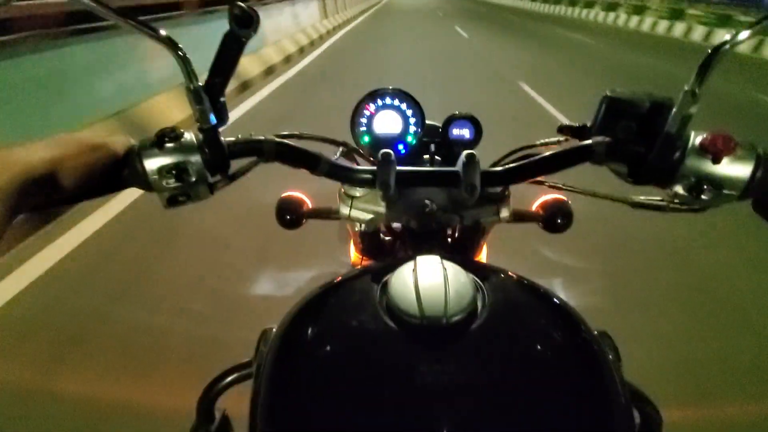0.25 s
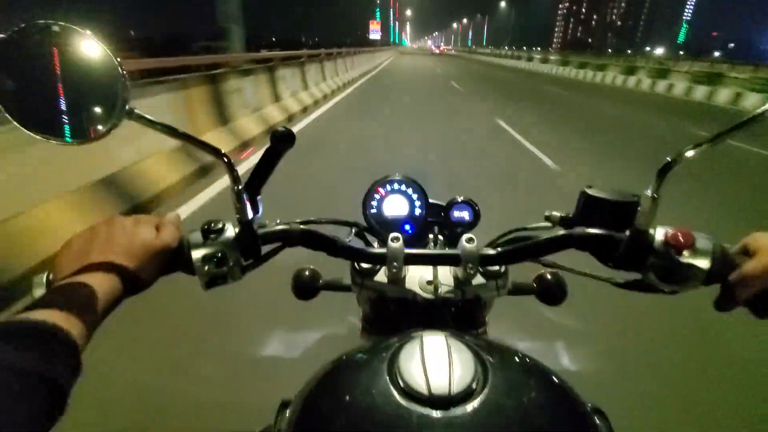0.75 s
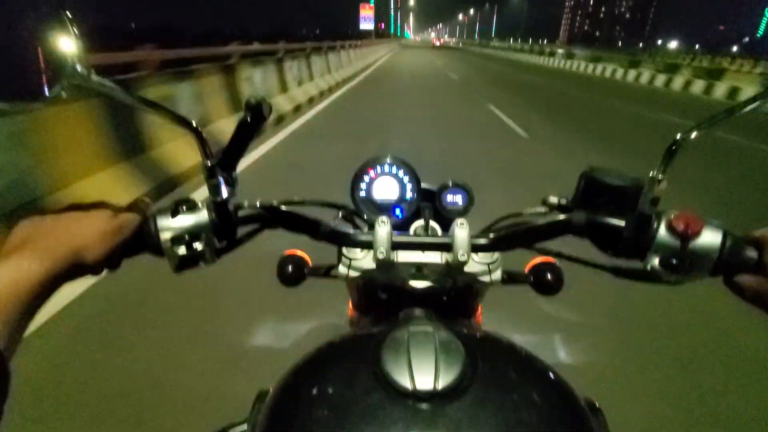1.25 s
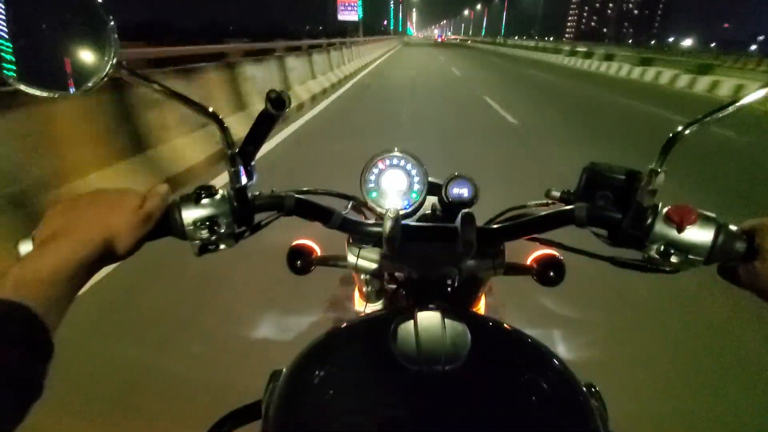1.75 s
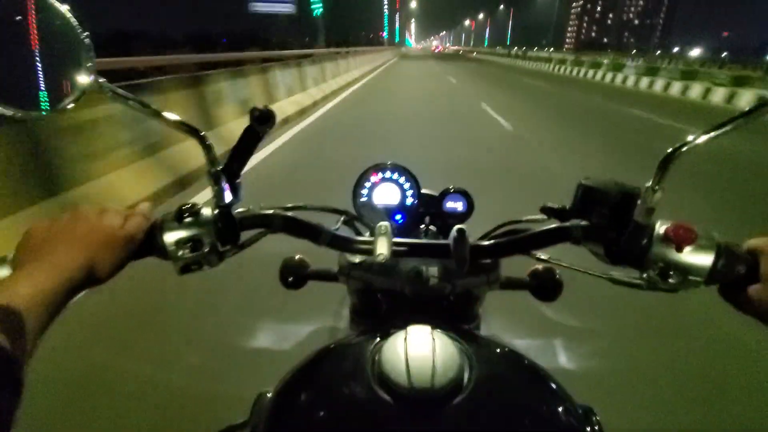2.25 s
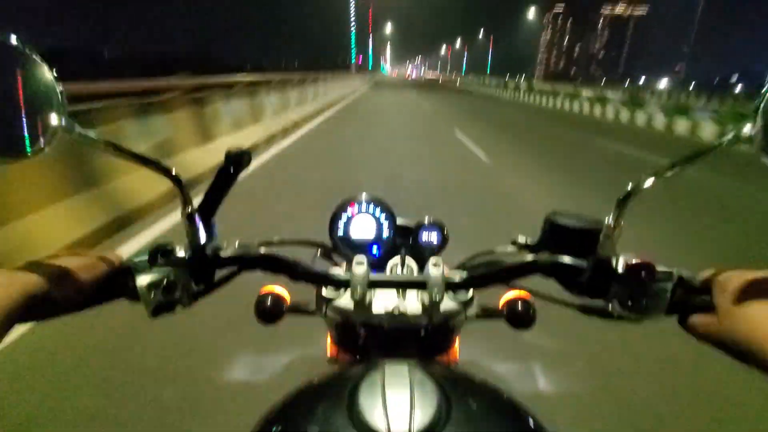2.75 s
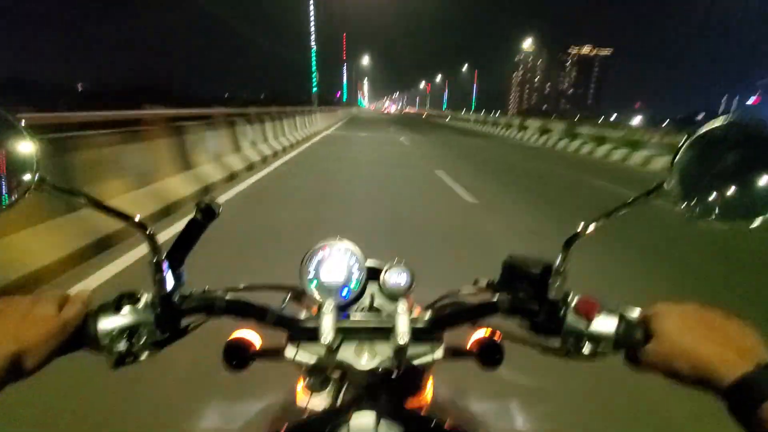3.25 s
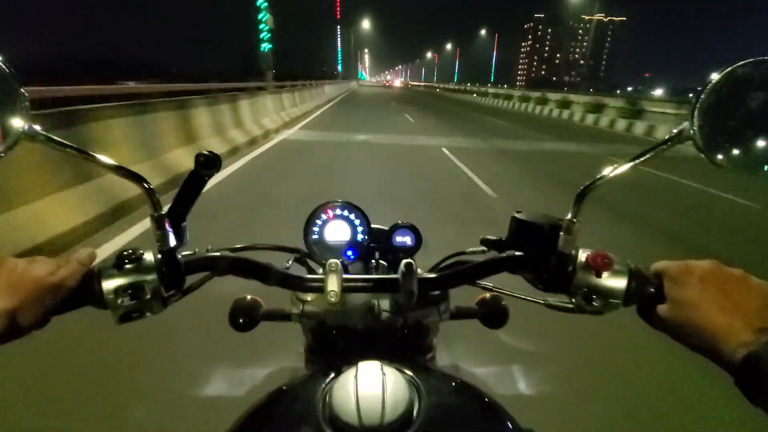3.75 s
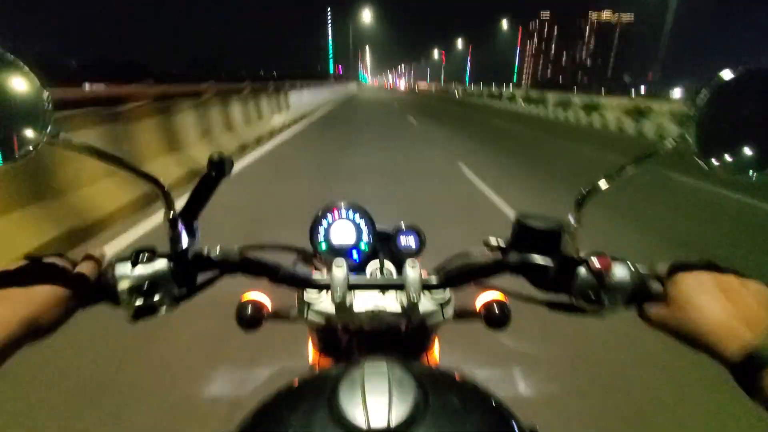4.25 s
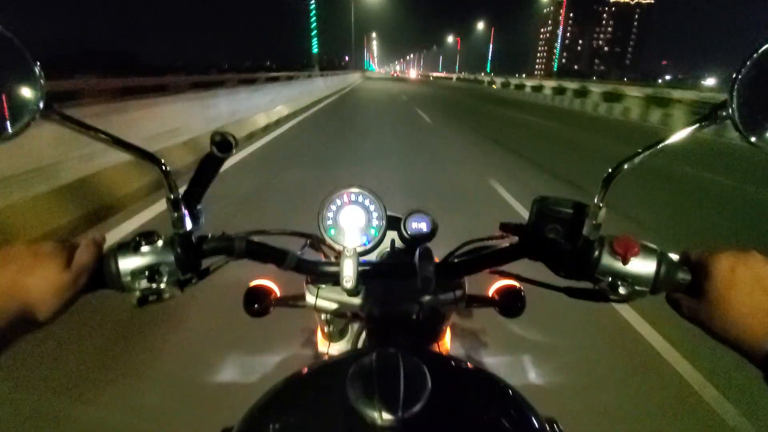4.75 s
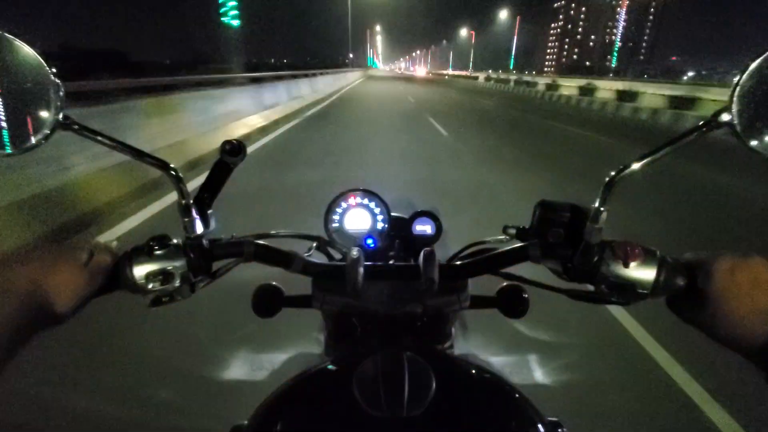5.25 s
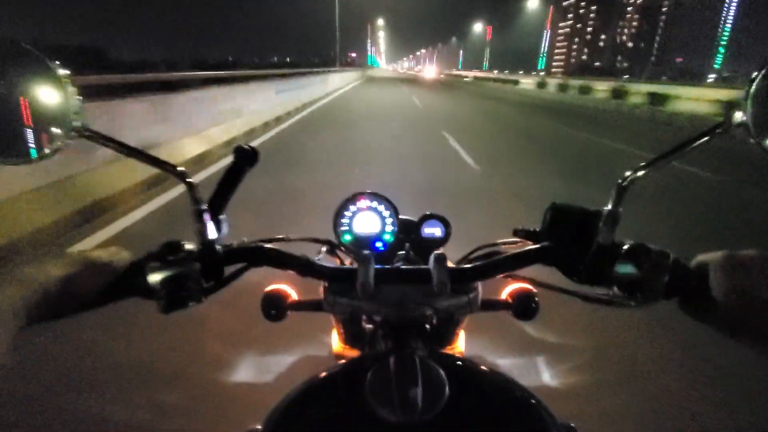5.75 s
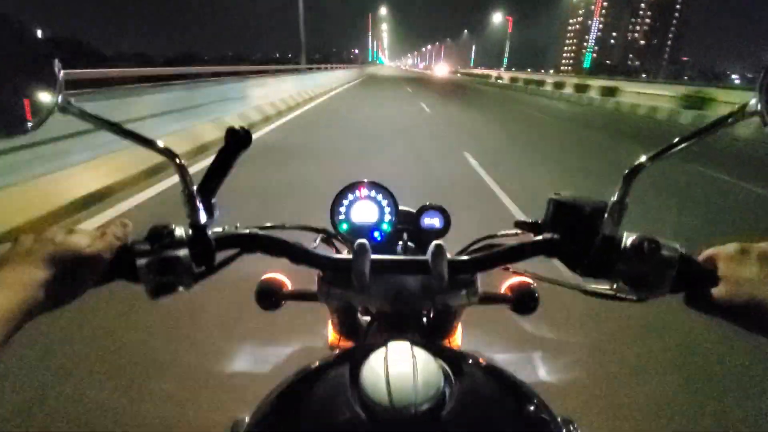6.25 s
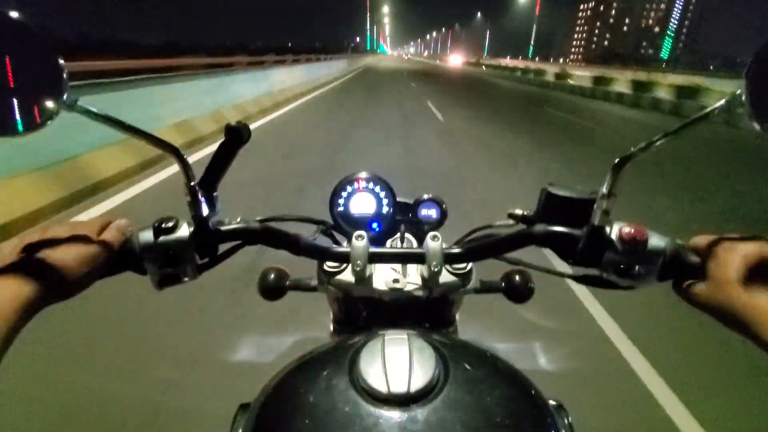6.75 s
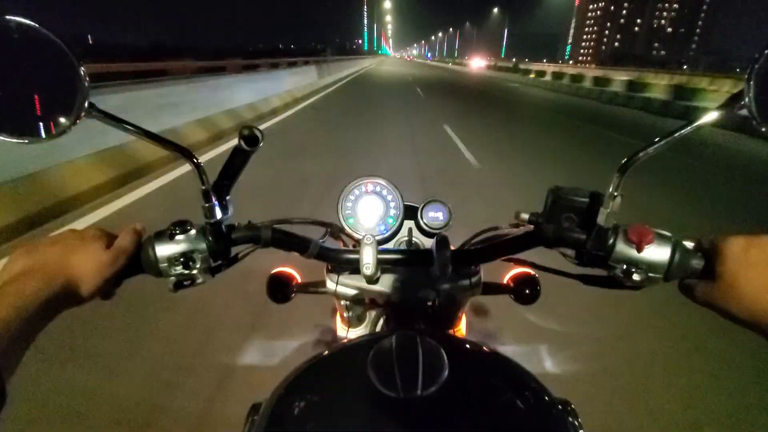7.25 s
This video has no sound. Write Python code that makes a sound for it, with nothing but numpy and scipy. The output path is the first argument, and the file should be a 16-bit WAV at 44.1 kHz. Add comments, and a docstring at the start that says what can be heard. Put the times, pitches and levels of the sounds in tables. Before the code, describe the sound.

A twin-cylinder motorcycle is already accelerating hard, heard close up from the rider's seat. The exhaust thumps and growls, with a hollow intake honk, some rasp and light metallic ticking. At about 0.7 seconds the throttle shuts and the pitch dips for an upshift, with a quick blip near 1 second. The engine climbs steadily from 1.2 to 3 seconds with a thin gear whine, then eases off for a second shift. It pulls again from about 3.5 seconds until 5.9, where a short dull knock marks the third shift. From around 6.4 seconds it rises more slowly, still pulling at the end, near 7.5 seconds. Wind and road rush run underneath throughout, with low gusts buffeting the microphone more and more as speed builds. Two fainter knocks come through the wind just after 7 seconds.

```python
"""Twin-cylinder motorcycle, three upshifts.

A hard pull through four gears, heard from the rider's seat. Exhaust orders thump and growl through
the pipe resonances, the airbox honks under throttle, each firing barks, rasps and ticks, and the
gear teeth whine. Wind buffets the microphone more and more as the speed builds."""
import sys
import numpy as np
from scipy import signal
from scipy.fft import rfft, irfft
from scipy.io import wavfile

SR = 44100
rng = np.random.default_rng(int(sys.argv[2]) if len(sys.argv) > 2 else 0)


def generate_wav(sig):
    """Save sig (samples, or channels by samples) to the path in sys.argv[1] as 16-bit PCM at SR."""
    pcm = np.round(np.clip(np.atleast_2d(sig).T, -1, 1) * 32767).astype(np.int16)
    wavfile.write(sys.argv[1], SR, pcm)


N = 330294
TIME_S = np.arange(N) / SR
BINS_HZ = np.fft.rfftfreq(N, 1 / SR)


def amp(db):
    """Decibels to gain."""
    return 10 ** (np.asarray(db) / 20)


def unit(x):
    """Scale to rms 1."""
    return x / np.sqrt(np.mean(x ** 2) + 1e-20)


def db_at(spectrum, hz):
    """Level of a spectrum table, interpolated over log frequency."""
    table_hz, db = np.transpose(spectrum)
    return np.interp(np.log(hz + 1), np.log(table_hz), db)


def noise(spectrum):
    """Noise of a given spectral shape, rms 1."""
    return unit(irfft(rfft(rng.standard_normal(N)) * amp(db_at(spectrum, BINS_HZ)), N))


def wander(hz):
    """Random drift up to about hz, rms 1."""
    return unit(irfft(rfft(rng.standard_normal(N)) / (1 + (BINS_HZ / hz) ** 4), N))


def fuzz(cycles, width_hz):
    """Narrow noise band around a tone, rms 1."""
    phase = 2 * np.pi * cycles
    return wander(width_hz) * np.cos(phase) + wander(width_hz) * np.sin(phase)


def pulse(age):
    """Quick rise to 1 at age 1, slower fall."""
    age = np.maximum(age, 0)
    return age * np.exp(1 - age)


def burst(cycles, at_cycles, rise_cycles):
    """One pulse a cycle."""
    return pulse((cycles - at_cycles) % 1 / rise_cycles)


# Per gear: clutch bites t/s, clutch pulled t/s; cycle rate low, top, mid-pull bow, shift hang, all f/Hz
PULLS = [(0, .67, 33.11, 37.9, .53, 0), (1.17, 3.02, 30.72, 39.65, .1, .43),
         (3.55, 5.89, 32.86, 39.81, .09, .47), (6.45, 7.6, 34.5, 36.7, .25, 1.2)]

def revs():
    """Four-stroke cycle rate in Hz: a near-straight climb in each gear, an easy fall to the next."""
    cycle_hz, last_pulled_s, last_top_hz = np.zeros(N), -1, PULLS[0][2]
    for bites_s, pulled_s, low_hz, top_hz, bow_hz, hang_hz in PULLS:
        fall = np.clip((TIME_S - last_pulled_s) / (bites_s - last_pulled_s), 0, 1)
        climb = np.clip((TIME_S - bites_s) / (pulled_s - bites_s), 0, 1)
        shift_hz = (last_top_hz - low_hz) * np.cos(np.pi / 2 * fall) ** 2 + hang_hz * np.sin(np.pi * fall)
        climb_hz = (top_hz - low_hz) * climb + bow_hz * np.sin(np.pi * climb)
        cycle_hz = np.where(TIME_S >= last_pulled_s, low_hz + shift_hz + climb_hz, cycle_hz)
        last_pulled_s, last_top_hz = pulled_s, top_hz
    return cycle_hz


# Throttle per gear: opens t/s, roll-on/s, closes t/s, closing time/s
THROTTLE = [(-.05, 0.17, 0.628, 0.052), (1.115, 0.25, 2.995, 0.044), (3.43, 0.23, 5.86, 0.1),
            (6.29, 0.43, 8.15, .05)]

def throttle(twist=.37, twist_s=.022, blip_at_s=1.048, blip_half_s=.048):
    """Opening 0-1: quick twist, slow roll toward full, close; one blip in the first shift."""
    opening = .55 * np.exp(-((TIME_S - blip_at_s) / blip_half_s) ** 4)
    for opens_s, roll_s, closes_s, closing_s in THROTTLE:
        age_s = np.maximum(TIME_S - opens_s, 0)
        rise = twist * (1 - np.exp(-age_s / twist_s)) + (1 - twist) * (1 - np.exp(-age_s / roll_s))
        fall = np.exp(-(np.maximum(TIME_S - closes_s, 0) / closing_s) ** 1.9)
        opening = np.maximum(opening, rise * fall)
    return opening


# Per gear: load/dB, airbox order 7/dB, airbox order 8/dB, teeth per cycle, whine/dB, metallic edge/dB
GEAR_SOUND = [(-.5, -14, -10.5, 20.45, -48, 2.5), (0, -11.4, -10.1, 20.47, -21.6, 1),
              (-1, -10.8, -14.3, 20.45, -26, -.7), (-1.7, -14.3, -15.3, 24.36, -26, -.5)]

def engaged_gear(shift_s=.2):
    """Gear settings per sample; the next gear drops in shift_s after the clutch is pulled."""
    changes_s = [pulled_s + shift_s for _, pulled_s, *_ in PULLS[:-1]]
    return np.array(GEAR_SOUND)[np.searchsorted(changes_s, TIME_S)].T


def road_speed(cycle_hz):
    """Road speed in dB re its top: grows as the revs rise, holds as they fall."""
    gained_db = np.cumsum(np.maximum(np.gradient(20 * np.log10(cycle_hz)), 0))
    return gained_db - gained_db[-1]


# Gusts and lulls: t/s, half length/s, level/dB
GUSTS = [(0, 0.3, -22), (0.716, .03, -5), (0.77, 0.024, 3.5), (1.6, 0.31, -1), (2.76, 0.05, 2.5),
         (2.882, .04, 2.5), (3.192, 0.41, -2.5), (3.77, 0.029, -2), (3.903, 0.22, 2), (4.203, 0.17, 2),
         (4.694, 0.081, 2.5), (5.5, 0.22, 0), (5.95, 0.043, -4), (6.15, 0.28, -1.2), (6.262, 0.025, 3),
         (6.324, 0.039, -1.5), (6.933, 0.049, 1), (7.246, 0.21, -0.5)]

def headwind(road_db, level_db, power, by_gust):
    """Gain of a wind layer: a power of road speed, varied by gusts."""
    gust_db = sum(db * np.exp(-((TIME_S - at_s) / half_s) ** 2) for at_s, half_s, db in GUSTS)
    return amp(level_db + power * road_db + by_gust * gust_db)


# Spectra of wind rumble, buffeting, high-speed roar and road rush: f/Hz, level/dB
RUMBLE = [(20, -38), (35, -19.5), (50, -7.5), (65, -0.5), (100, 1), (150, -2), (250, -12), (600, -49.5),
          (3000, -76)]
BUFFET = [(20, -46.5), (50, -21), (80, -8), (120, -3.5), (160, 0.5), (220, -2), (320, -6), (450, -9.5),
          (700, -16), (1200, -37), (3000, -66.5)]
ROAR = [(50, -31), (110, -6), (165, 5.5), (230, -5), (300, -16.5), (390, -0.5), (520, -9), (800, -28),
        (3000, -54.5)]
RUSH = [(60, -6), (300, 10), (500, 2), (610, 5), (700, 6), (1000, 3.5), (1400, -3), (2000, -9.5),
        (2800, -21.5), (4000, -28.5), (5200, -25.5), (6000, -33), (7200, -47), (8500, -55)]

def wind(road_db, load_db, lumps_db=1.3, flicker_db=.6):
    """Eddies shake the microphone over a rush of air and driven tyres; a roar breaks out at top speed."""
    eddies = wander(38)
    rumble = noise(RUMBLE)
    buffet = unit(noise(BUFFET) * amp(lumps_db * eddies))
    roar = noise(ROAR)
    rush = unit(noise(RUSH) * amp(flicker_db * (eddies + wander(120)))) * amp(.21 * load_db)
    return (rumble * headwind(road_db, level_db=-15.8, power=1.76, by_gust=2.2)
            + buffet * headwind(road_db, level_db=-13, power=3.2, by_gust=.9)
            + roar * headwind(road_db, level_db=-19, power=9.7, by_gust=.3)
            + rush * headwind(road_db, level_db=-25.5, power=.56, by_gust=.15))


# Knocks: t/s, level/dB
KNOCKS = [(5.885, -12.5), (7.099, -21), (7.265, -20)]
# Knock spectrum: f/Hz, level/dB
KNOCK_SPECTRUM = [(100, -3), (350, 8), (650, 1), (1100, -15), (2500, -29.5), (8000, -52.5)]

def knocks(rise_s=.0026):
    """Short dull knocks stand out of the wind at speed."""
    return sum(amp(db) * pulse((TIME_S - at_s) / rise_s) for at_s, db in KNOCKS) * noise(KNOCK_SPECTRUM)


def whistle(cycles, cycle_hz, order, width_hz, centre_hz, reach_hz):
    """A thin fuzzy tone follows the revs and swells as it crosses a casing resonance."""
    return fuzz(order * cycles, width_hz) / np.hypot(1, (order * cycle_hz - centre_hz) / reach_hz)


def casing(cycles, cycle_hz, drive_db, ring_hz=1400):
    """The engine casing rings and sings faintly, with a hissy tone far above."""
    ring = fuzz(ring_hz * TIME_S, width_hz=30)
    sing = whistle(cycles, cycle_hz, order=37.15, width_hz=6.8, centre_hz=ring_hz, reach_hz=60)
    hiss = whistle(cycles, cycle_hz, order=154, width_hz=310, centre_hz=5550, reach_hz=190)
    return amp(drive_db) * (amp(-47) * ring + amp(-46) * sing + amp(-61) * hiss)


# Gearbox resonances: f/Hz, level/dB
GEARBOX = [(620, -7), (660, -7), (688, -14), (720, -6), (738, -9), (752, -5), (769, -.5), (782, -1.5),
           (793, -10), (812, -12.5), (860, -11), (900, -14)]

def gear_whine(cycles, cycle_hz, opening, teeth, whine_db, flutter_db=1, waver_rad=.15):
    """Meshing teeth whine under load, throb once a cycle and swell across the gearbox resonances."""
    level_db = whine_db + db_at(GEARBOX, teeth * cycle_hz) + flutter_db * wander(12)
    torque = 1 + .4 * np.cos(2 * np.pi * cycles)
    mesh = np.sin(2 * np.pi * teeth * cycles + waver_rad * wander(41))
    return np.sqrt(2 * opening) * torque * amp(level_db) * mesh


# Metal tick spectrum: f/Hz, level/dB
TICK = [(300, -10), (1000, -4.5), (1800, 10.5), (2700, 1), (3800, -1.5), (5000, -12.5), (6500, -17.5),
        (8500, -30.5)]

def valve_clatter(cycles, level_db=-56.5, uneven_db=1.5):
    """The valve gear taps lightly eight times a cycle, throttle open or shut."""
    taps = burst(8 * cycles, 0, .23) * amp(-uneven_db * wander(90))
    return amp(level_db) * unit(taps) * noise(TICK)


SECOND_FIRING_CYCLES = .625  # lag of the second cylinder

def head_ticks(cycles, load_db, level_db=-45, width_cycles=.055, uneven_db=1):
    """Sharp metallic knocks from the cylinder head, one cylinder louder."""
    first, second = (np.exp(-abs((cycles - at + .5) % 1 - .5) / width_cycles)
                     for at in (0, SECOND_FIRING_CYCLES))
    taps = (first + .55 * second) * amp(uneven_db * wander(40))
    return amp(level_db + .9 * load_db) * unit(taps) * noise(TICK)


# Valve gas spectrum: f/Hz, level/dB
RASP = [(100, -28), (300, 3.5), (480, -1), (610, 4), (720, -2), (1000, -4), (1400, 0), (1900, 0.5),
        (2800, -18), (3700, -9), (4800, -23), (5600, -18.5), (6500, -23), (7700, -29), (8500, -45)]

def valve_rasp(cycles, load_db, level_db=-39, steady=.45, rise_cycles=.11, lead_cycles=.12):
    """Gas hisses through the valves in puffs that start just ahead of each head tick."""
    first, second = (burst(cycles + lead_cycles, at, rise_cycles) for at in (0, SECOND_FIRING_CYCLES))
    return amp(level_db + load_db) * unit(steady + first + .32 * second) * noise(RASP)


# Firing bark spectrum: f/Hz, level/dB
BARK = [(300, -28), (550, -10), (750, 13), (950, -1), (1200, 9.5), (1390, 1.5), (1600, -9), (1900, -9.5),
        (2400, -4), (3500, -28.5)]

def firings(cycles, drive_db, level_db=-38.5, lead_cycles=.0606, jitter_cycles=.0004, decay_s=.006):
    """Two unevenly spaced pulses a cycle ring the same metalwork: a hard bark."""
    crank = cycles + lead_cycles + jitter_cycles * wander(38)
    pulses = np.zeros(N)
    for at, size in ((0, 1), (SECOND_FIRING_CYCLES, .8)):
        pulses[1:] += size * (np.diff(np.floor(crank - at)) > 0)
    ring = noise(BARK)[:2048] * np.exp(-TIME_S[:2048] / decay_s)
    bark = signal.oaconvolve(pulses, ring)[:N]
    bark = signal.sosfilt(signal.butter(4, 3000, fs=SR, output="sos"), bark)
    return amp(level_db + drive_db) * unit(bark)


GAS_PULSE_CYCLES, SECOND_PULSE_GAIN = (.53, .86), .72

def intake(cycles, cycle_hz, load_db, ring_hz=603.5, reach_hz=14, steady=.69, rise_cycles=.07):
    """Drawn air pulses in one resonance, more as order 17 crosses it; one gulp as the throttle reopens."""
    gulp_at_s, gulp_rise_s = 1.045, .049
    crossing = 1 / (1 + ((17 * cycle_hz - ring_hz) / reach_hz) ** 2)
    flow = amp(-36.5 + .14 * load_db + 5.5 * crossing)
    gulp = amp(-26.5) * pulse((TIME_S - gulp_at_s) / gulp_rise_s)
    first, second = (burst(cycles, at - rise_cycles, rise_cycles) for at in GAS_PULSE_CYCLES)
    draws = unit(steady + first + SECOND_PULSE_GAIN * second)
    return (flow + gulp) * draws * fuzz(ring_hz * TIME_S, width_hz=27)


def choke_db(cycle_hz, onset_hz=37.56, db_per_hz=-2.5):
    """Gas flow lost near top revs."""
    return db_per_hz * np.maximum(cycle_hz - onset_hz, 0)


# Airbox resonance: f/Hz, level/dB
AIRBOX = [(220, -27), (238, -17), (247, -10), (256, -5), (267, -2.8), (277, 0), (288, -2.5), (296, -6),
          (305, -8), (320, -12)]

def airbox(cycles, cycle_hz, opening, road_db, seventh_db, eighth_db, level_db=-.5):
    """The airbox honks as orders 7 and 8 pass its resonance; strong wind makes it flutter."""
    ring = sum(amp(db + db_at(AIRBOX, order * cycle_hz)) * np.cos(2 * np.pi * order * (cycles + .5))
               for order, db in ((7, seventh_db), (8, eighth_db)))
    flutter_db = .3 + amp(3.7 * road_db)
    honk_db = level_db + choke_db(cycle_hz) + flutter_db * wander(19)
    return np.sqrt(2) * opening ** 1.05 * amp(honk_db) * ring


# Pipe resonances: f/Hz, level/dB
PIPE = [(62, -4), (74, 0), (94, -1), (106, -1), (116, 3.5), (128, -2), (158, 2), (180, 1.5), (238, -0.5),
        (280, 10), (325, 5.5), (360, -7.5), (400, -1.5), (440, 1.8), (470, -4.5), (500, -5.5), (545, 6.5),
        (580, 1.5), (615, 8), (635, 4), (660, -6.5), (760, -4), (1000, -6)]
# High exhaust orders: multiple of cycle rate, level/dB
GROWL = [(9, -38), (10, -30), (11, -35), (12, -42.5), (13, -34.5), (14, -36.5), (15, -37), (16, -44),
         (17, -36.5), (18, -37), (19, -41.5), (20, -42), (21, -42), (22, -48), (23, -47), (24, -45),
         (27, -48)]

def exhaust_growl(cycles, cycle_hz, load_db, level_db=1.35, flutter_db=1, fade_db=4):
    """Two gas pulses a cycle ring the pipes, fading near top revs and as the wind carries them back."""
    lag_cycles, lag_below_order = .3, 13.5  # low orders ring on and arrive later
    first_at, second_at = GAS_PULSE_CYCLES
    growl = np.zeros(N)
    for order, db in GROWL:
        spin = -2j * np.pi * order
        pair = np.exp(spin * first_at) + SECOND_PULSE_GAIN * np.exp(spin * second_at)
        phase = 2 * np.pi * (order * cycles - lag_cycles * min(order, lag_below_order)) + np.angle(pair)
        order_db = db + db_at(PIPE, order * cycle_hz) + flutter_db * wander(5)
        growl += np.sqrt(2) * amp(order_db) * np.cos(phase)
    return amp(level_db + load_db + .76 * choke_db(cycle_hz) - fade_db * TIME_S / TIME_S[-1]) * growl


# Low exhaust orders: multiple of cycle rate, level/dB
THUMP = [(1, -47.5), (2, -24), (3, -21.5), (4, -30), (5, -31), (6, -26.5)]

def exhaust_thump(cycles, cycle_hz, drive_db, level_db=-1.5, flutter_db=1.86):
    """Low orders glide through the pipe resonances and keep thumping with the throttle shut."""
    thump = np.zeros(N)
    for order, db in THUMP:
        order_db = db + db_at(PIPE, order * cycle_hz) + flutter_db * wander(14)
        phase = 2 * np.pi * (order * cycles + rng.random())  # scrambled by pipe echoes
        thump += np.sqrt(2) * amp(order_db) * np.cos(phase)
    return amp(level_db + drive_db) * thump


def scene(coast_db=-12.5, start_cycles=.15):
    """Throttle and crankshaft drive the engine layers; road speed drives the wind."""
    effort_db, seventh_db, eighth_db, teeth, whine_db, edge_db = engaged_gear()
    cycle_hz, opening = revs(), throttle()
    load_db = 20 * np.log10(amp(coast_db) * (1 - opening) + amp(effort_db) * opening)
    revs_db = 20 * np.log10(cycle_hz / cycle_hz.mean())
    road_db = road_speed(cycle_hz)
    cycles = start_cycles + np.cumsum(cycle_hz) / SR + .002 * wander(12)
    mix = exhaust_thump(cycles, cycle_hz, drive_db=.5 * load_db + .61 * revs_db)
    mix += airbox(cycles, cycle_hz, opening, road_db, seventh_db, eighth_db)
    mix += exhaust_growl(cycles, cycle_hz, load_db)
    mix += intake(cycles, cycle_hz, load_db)
    mix += firings(cycles, drive_db=load_db + edge_db + 1.4 * revs_db)
    mix += valve_rasp(cycles, load_db) + head_ticks(cycles, load_db) + valve_clatter(cycles)
    mix += gear_whine(cycles, cycle_hz, opening, teeth, whine_db)
    mix += casing(cycles, cycle_hz, drive_db=load_db + edge_db - .5 * road_db)
    mix += knocks() + wind(road_db, load_db)
    return mix[None]


def record(dry, highpass_hz=30, lowpass_hz=8700):
    """The microphone sheds the deepest bass, rounds off the loudest gusts and cuts the top treble."""
    lean = signal.sosfilt(signal.butter(2, highpass_hz, "highpass", fs=SR, output="sos"), dry)
    rounded = lean / (1 + lean ** 8) ** (1 / 8)
    lowpass = signal.firwin(511, lowpass_hz, window=("kaiser", 9), fs=SR)
    return signal.oaconvolve(rounded, lowpass[None], "same")


dry = scene()
out = record(dry)
generate_wav(out)
```